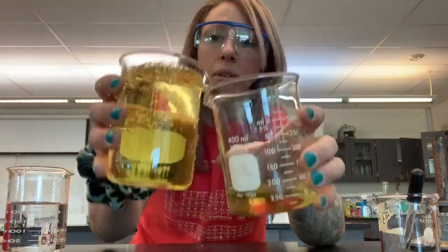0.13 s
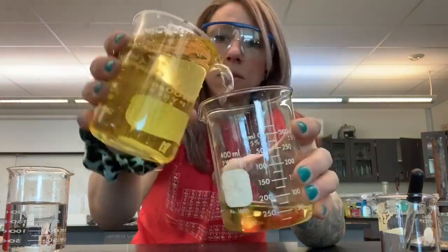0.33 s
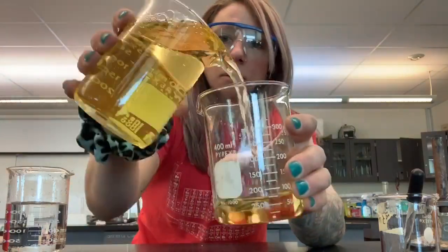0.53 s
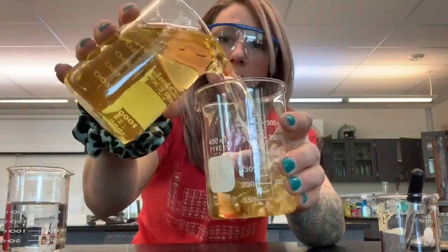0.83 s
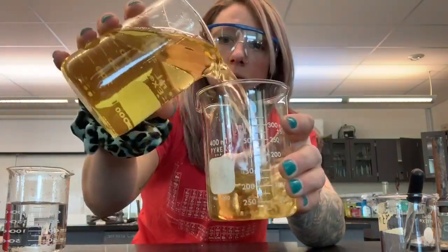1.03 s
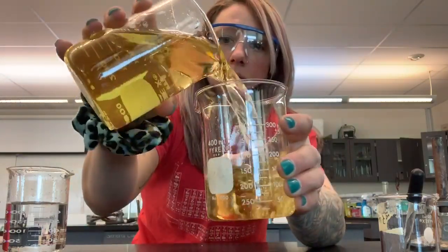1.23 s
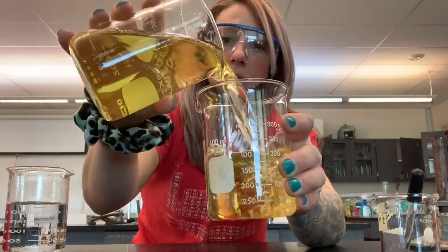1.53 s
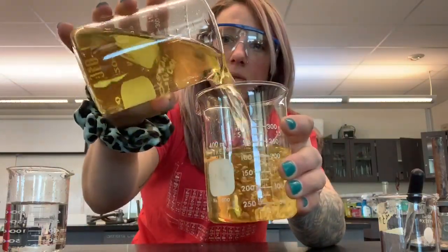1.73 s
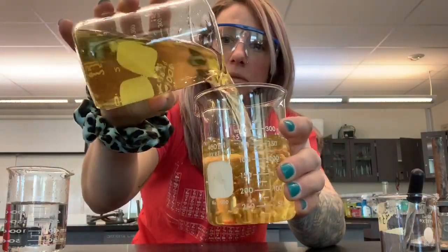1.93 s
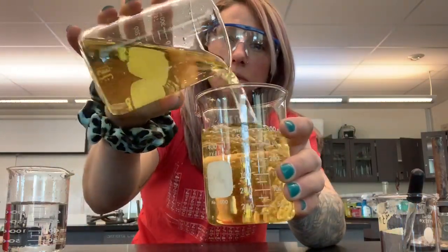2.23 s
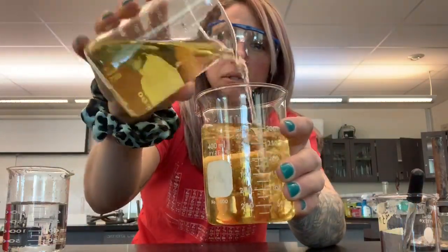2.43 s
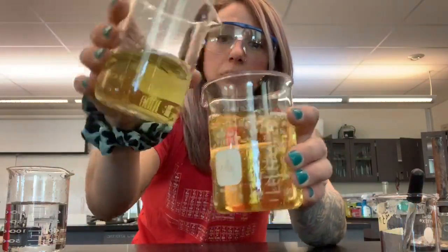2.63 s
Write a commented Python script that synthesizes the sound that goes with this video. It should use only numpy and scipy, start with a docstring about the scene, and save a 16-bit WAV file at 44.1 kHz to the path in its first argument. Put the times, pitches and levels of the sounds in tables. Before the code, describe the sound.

Liquid pours from one glass beaker into another, close to the microphone. After a few knocks, it lands with a splash, gurgles, rises in pitch and thins to a soft trickle. Classroom ventilation hums underneath.

```python
"""Liquid pours from one glass beaker into another, close up, in a ventilated classroom.
After a few knocks, the stream lands with a splash that rings the glass, gurgles as it traps large
bubbles, then thins to a soft trickle and last drops. Each bubble is a short, dying sine.
Impacts sound the air column in the receiving beaker, which rises in pitch as it fills.
A dull bed of ventilation noise and hum lies under it all."""
import sys
import numpy as np
from scipy import signal
from scipy.fft import rfft, irfft, next_fast_len
from scipy.io import wavfile

SR = 44100
rng = np.random.default_rng(int(sys.argv[2]) if len(sys.argv) > 2 else 0)


def to_wav(s):
    """Save 16-bit WAV."""
    ch = np.atleast_2d(s).T  # columns
    pcm = np.round(np.clip(ch, -1, 1) * 32767)  # PCM
    wavfile.write(sys.argv[1], SR, pcm.astype(np.int16))


N = 123479
T = np.arange(N) / SR
ROOM_T60_S = 0.37

# colour of the ventilation bed: f/Hz, level/dB
VENT_COLOUR = [(22, -39), (45, -17), (80, -10.5), (125, -8.5), (155, -6.5), (210, 1), (280, 1.5),
               (380, -6.5), (500, -5.5), (700, -10), (950, -22), (1500, -21.5), (1900, -40), (5000, -43),
               (9000, -52), (15000, -56.5)]
# its hum tones: f/Hz, level/dB
VENT_HUM = [(126, -61.5), (206, -56.5), (281, -60.5), (475, -62)]
# its panning: f/Hz, left minus right/dB
VENT_PAN = [(100, 1.5), (200, 0.5), (350, -3), (600, 2.5), (1100, 3), (2500, -2)]
# its stereo width: f/Hz, left-right correlation
VENT_WIDTH = [(60, 0.95), (150, 0.9), (350, 0.54), (900, 0.96), (2000, 0.55), (6000, 0.6), (8000, 0.7),
              (15000, .95)]
# its phase between the microphones: f/Hz, left lead/rad
VENT_LEAD = [(60, 0.085), (150, 0.47), (280, 1.21), (480, 2.01), (1000, 2.42), (5000, 3.3), (9000, 1.6),
             (13500, 5.6)]
# knocks, the first already dying away: t/s, level/dB, room send/dB
KNOCK_CUES = [(-.045, -37, 7), (.068, -56.5, 15), (0.1101, -31, -0.5), (0.1131, -33, -3.5)]
# colour of a knock: f/Hz, level/dB
KNOCK_COLOUR = [(200, -7), (800, 0.5), (1450, 11.5), (2000, 1), (3200, 6), (5000, 5.5), (7500, -1.5),
                (9400, -0.5), (11000, -4), (12500, -8), (15500, -12)]
# faders of the stream: t/s, gurgle level/dB, trickle level/dB, spray level/dB
STREAM_FADERS = [(0.48, -81, -80, -79), (0.54, -68.5, -59.5, -63), (0.64, -63, -72, -66),
                 (0.72, -62, -56, -60), (0.82, -56, -58, -60.5), (0.91, -54, -70, -64.5),
                 (1.06, -55.5, -58, -63), (1.15, -55, -67, -71), (1.25, -58.5, -66, -77),
                 (1.34, -50, -61, -75), (1.46, -56.5, -64, -86), (1.64, -62.5, -66.5, -87),
                 (1.91, -65.5, -66, -85), (2.04, -64, -66.5, -87), (2.23, -67, -68.5, -87),
                 (2.53, -66, -74.5, -85), (2.68, -70, -78, -84), (2.8, -73.5, -92, -100)]
# pitch of the air column above the liquid: t/s, f/Hz
COLUMN_PITCH = [(.5, 846), (1.25, 855), (1.45, 930), (1.65, 1105), (2.3, 1280), (2.7, 1370)]
# colour of the small bubbles: f/Hz, level/dB
TRICKLE_COLOUR = [(1300, 11), (1700, -14), (2080, 2), (2350, -7.5), (2620, 4.5), (2900, 1), (3330, 3),
                  (4000, -14.5), (5000, -13)]
# cross resonances of the air in the beaker: f/Hz, level/dB, bandwidth/Hz
CAVITY_MODES = [(2095, 2, 165), (2590, -0.5, 320), (3350, 4, 290), (4490, -8.5, 730), (5760, -12.5, 290),
                (6480, -10.5, 380)]
# colour of spray and fizz: f/Hz, level/dB
SPRAY_COLOUR = [(1500, -16), (3500, 12), (4500, -4.5), (5800, 7.5), (7200, -0.5), (8600, 0), (10300, 0.5),
                (12000, -9.5), (15500, -6.5)]
# thin ring as the liquid first spreads: t/s, f/Hz, level/dB
RING_SWEEP = [(.455, 4950, -70), (.52, 5330, -58), (.558, 5740, -46), (.59, 6030, -54), (.70, 6450, -57),
              (.76, 6900, -70)]
# featured bubbles and drops: t/s, f/Hz, level/dB, t60/s, rise/(share of pitch per s)
PLOP_CUES = [(.478, 3460, -55, .049, 0), (.494, 2600, -44, .015, 0), (.5355, 2108, -32.5, .017, 0),
             (.537, 2640, -37.5, .025, 0), (.539, 3300, -31, .031, 0), (.608, 3500, -48, .02, 2),
             (.619, 3620, -49, .02, 2), (.652, 2230, -47.5, .026, 0), (.665, 1200, -44, .04, 4),
             (.669, 1880, -38, .022, 12), (.686, 2640, -36.5, .022, 0), (.690, 1130, -43, .03, 6),
             (.723, 1326, -41, .022, 3), (.735, 4370, -39.5, .023, 0), (.738, 2000, -39.5, .026, 12),
             (.778, 1870, -37, .035, 16), (.7825, 3470, -37, .018, 0), (.7848, 820, -31, .027, 7),
             (.805, 2060, -35.5, .018, 4), (.815, 1430, -41, .025, 5), (.824, 1200, -38.5, .013, 0),
             (.825, 830, -36, .035, 2), (.8305, 2020, -43, .018, 4), (.834, 854, -41, .06, 2),
             (.882, 1300, -38, .017, 0), (.891, 870, -38.5, .022, 5), (.989, 960, -39, .03, 8),
             (1.010, 3340, -47, .025, 0), (1.015, 1096, -36, .03, 0), (1.030, 880, -34, .04, 0),
             (1.035, 2010, -43, .014, 4), (1.039, 4950, -48, .022, 0), (1.0475, 850, -24.5, .023, 5),
             (1.053, 2000, -39, .013, 5), (1.084, 1960, -45, .025, 2), (1.098, 885, -40.5, .03, 2),
             (1.172, 860, -35.5, .02, 3), (1.203, 852, -40, .026, 2), (1.248, 720, -39.5, .03, 3),
             (1.2545, 2110, -50, .018, 4), (1.267, 705, -33.5, .06, 6), (1.296, 2480, -43, .02, 2),
             (1.311, 1370, -37.5, .027, 8), (1.326, 2600, -43, .035, 2), (1.324, 892, -38.5, .025, 4),
             (1.345, 890, -37, .035, 3), (1.360, 1180, -41, .025, 8), (1.371, 827, -35.5, .03, 4),
             (1.372, 1880, -39.5, .013, 4), (1.411, 1170, -37, .025, 9), (1.413, 2050, -45, .016, 3),
             (1.452, 920, -39.5, .023, 6), (1.466, 2110, -50, .018, 3), (1.503, 1150, -46, .022, 4),
             (1.524, 5750, -51.5, .029, 0), (1.609, 2580, -51, .02, 0), (1.626, 6110, -52, .021, 0),
             (1.64, 1115, -49, .18, 0), (1.7015, 2610, -50, .02, 0), (1.801, 1190, -45, .018, 3),
             (1.818, 1300, -41, .01, 0), (1.8205, 2560, -46, .012, 0), (1.86, 5930, -48, .025, 0),
             (1.867, 2790, -51, .03, 0), (1.960, 1280, -45.5, .025, 4), (1.976, 3420, -52, .02, 0),
             (2.071, 2200, -52, .018, 3), (2.218, 3230, -50, .022, 0), (2.343, 1150, -38, .016, 6),
             (2.392, 3230, -51, .035, 0), (2.456, 2540, -50, .03, 0), (2.475, 2530, -48, .023, 0),
             (2.547, 2530, -53, .022, 0), (2.5803, 1390, -37.5, .028, 2), (2.581, 2110, -38, .0053, 0),
             (2.605, 2000, -50, .015, 0)]
# drops slapping liquid and glass: t/s, snap level/dB, ring level/dB, snap t60/s, tick level/dB
SPLASH_CUES = [(.5362, -42, -33.5, .008, -22), (.554, -40, -56, .012, -42), (.762, -54, -42.5, .015, -48),
               (.8803, -35, -41, .036, -45), (.9356, -43, -69, .02, -37), (1.105, -41, -69, .015, -36),
               (1.373, -39, -54, .011, -55)]
# colour of a splash's snap: f/Hz, level/dB
SNAP_COLOUR = [(500, -16), (1200, 1), (2500, 9), (4500, 8.5), (6500, 6.5), (9000, 7.5), (12000, 1),
               (16000, -7.5)]
# its stereo width: f/Hz, left-right correlation
SNAP_WIDTH = [(1000, .8), (3500, .2), (6000, .4), (9000, .9)]
# colour of the bright tick at contact: f/Hz, level/dB
TICK_COLOUR = [(4000, -16), (7000, 0), (11000, 0.5), (16000, 3)]
# ring of the beaker: f/Hz, level/dB, t60/s
BEAKER_MODES = [(2250, -14, 0.072), (2585, -9.5, 0.047), (3299, 1.5, 0.042), (5163, -24.5, 0.048),
                (5755, -12, 0.1), (6450, -25, .1)]
# fine droplets on the glass: t/s, f/Hz, level/dB, attack/s
DROPLET_CUES = [(.6636, 10440, -38, .0006), (.6803, 10700, -36, .0006), (.7833, 10190, -40, .0005),
                (.8274, 10080, -43, .0005), (.9691, 10080, -42, .0005), (1.0012, 9820, -36, .0005),
                (1.058, 15200, -41, .0004), (1.0783, 9730, -39, .0006), (1.153, 9600, -39, .0005),
                (1.2245, 9950, -44, .0005), (1.6517, 9240, -43, .00015), (1.7009, 9930, -51, .0004),
                (1.8222, 9520, -48, .0006), (2.0175, 8590, -36, .00015), (2.05, 8570, -37, .00015),
                (2.0552, 8480, -34, .00017), (2.579, 7800, -45, .0002)]
# stereo width of the room sound: f/Hz, left-right correlation
ROOM_WIDTH = [(200, .6), (1000, -0.33), (4000, -.2), (5500, 0.2), (8000, 0.4), (10000, .85), (14000, .85)]
# panning of the pour: f/Hz, left minus right/dB
POUR_PAN = [(500, -1.5), (1000, -4.5), (2000, -1), (3500, -2), (5000, 4), (6500, 0), (15000, 1)]
# phase of pour and knocks between the microphones: f/Hz, left lead/rad
ACTION_LEAD = [(200, -.1), (1000, -.75), (2000, -1.6), (4000, -3.0), (6000, -4.3), (7200, -4.0),
               (9100, -3.14), (11000, -1.7), (12200, -.8), (13200, 0), (16000, .2)]


def from_db(db):
    """Decibels to gain."""
    return 10 ** (np.asarray(db) / 20)


def unit_rms(x):
    """Normalise to an rms of 1."""
    return x / np.sqrt(np.mean(x ** 2) + 1e-20)


def at_hz(points, hz):
    """Read a table on a log-frequency axis."""
    f, value = np.transpose(points)
    return np.interp(np.log(hz + 1), np.log(f), value)


def shaped(x, response):
    """Filter by a response given as a function of frequency."""
    size = next_fast_len(2 * N)
    hz = np.arange(size // 2 + 1) * SR / size
    return irfft(rfft(x, size) * response(hz), size)[..., :N]


def eq(x, colour):
    """Equalise by a table of f/Hz, level/dB."""
    return shaped(x, lambda hz: from_db(at_hz(colour, hz)))


def resonance(hz, width_hz):
    """Coefficients of a resonant band-pass with a peak gain of 1."""
    r = np.exp(-np.pi * width_hz / SR)
    return (1 - r * r) / 2 * np.array([1, 0, -1]), [1, -2 * r * np.cos(2 * np.pi * hz / SR), r * r]


def mid_side(pair, width):
    """Mix two unrelated signals as mid and side to set their correlation."""
    def response(hz):
        correlation = at_hz(width, hz)
        return np.sqrt(np.array([1 + correlation, 1 - correlation]) / 2)
    mid, side = shaped(pair, response)
    return np.array([mid + side, mid - side])


def phased(pair, lead):
    """Set the phase difference between left and right."""
    return shaped(pair, lambda hz: np.exp(.5j * at_hz(lead, hz) * np.array([[1], [-1]])))


def panned(pair, pan):
    """Set the level difference between left and right."""
    return shaped(pair, lambda hz: from_db(at_hz(pan, hz) / 2 * np.array([[1], [-1]])))


def add(out, s, sound):
    """Mix a sound in at s seconds, trimmed to the track."""
    i = int(s * SR)
    sound, i = sound[max(-i, 0):], max(i, 0)
    out[i:i + len(sound)] += sound[:max(len(out) - i, 0)]


def dying_noise(t60):
    """White noise that falls 60 dB in t60 seconds."""
    return rng.standard_normal(SR) * from_db(-60 * T[:SR] / t60)


def narrow_noise(shape, centre_hz, half_width_hz):
    """A narrow band of noise that wavers around its centre."""
    noise = rng.standard_normal(shape)
    return unit_rms(shaped(noise, lambda hz: 1 / (1 + ((hz - centre_hz) / half_width_hz) ** 2)))


def grains(per_s, spread_db):
    """Irregular grain cues: rows of t/s, signed gain, pitch draw from 0 to 1."""
    count = int(per_s * N / SR)
    jitter, strength, polarity, draw = np.random.default_rng(rng.integers(2 ** 31)).random((count, 4)).T
    times = (np.arange(count) + 2 * jitter) / per_s
    level_db = spread_db * np.minimum(-np.log(1 - strength), 3)
    return np.transpose([times, from_db(level_db) * np.sign(polarity - .5), draw])


def clicks(per_s, spread_db):
    """A train of random impacts."""
    times, gains, _ = grains(per_s, spread_db).T
    return np.bincount((times * SR).astype(int), gains, N)[:N]


def ventilation():
    """A bed of dull air noise with a few wavering hum tones."""
    air = from_db(-49.5) * unit_rms(eq(rng.standard_normal((2, N)), VENT_COLOUR))
    for hz, db in VENT_HUM:
        air += from_db(db) * narrow_noise((2, N), hz, half_width_hz=7)
    return phased(panned(mid_side(air, VENT_WIDTH), VENT_PAN), VENT_LEAD)


def knocks(t60=0.028):
    """Hard clacks further off, wet with room sound."""
    pair = np.zeros((2, N))
    for s, db, send_db in KNOCK_CUES:
        tail_gain = from_db(db + send_db) * np.sqrt(t60 / ROOM_T60_S)
        for side in pair:
            add(side, s, from_db(db) * dying_noise(t60))
            add(side, s, tail_gain * dying_noise(0.79 * ROOM_T60_S))
    return eq(mid_side(pair, ROOM_WIDTH), KNOCK_COLOUR) * from_db([[1], [-1]])  # a little to the left


def bubble(hz, t60, glide, swell_cycles=1.7):
    """A trapped bubble rings: an unsteady sine that swells, glides up and dies."""
    t = T[:SR // 10]
    envelope = (1 - np.exp(-(t * hz / swell_cycles) ** 2)) * from_db(-60 * t / t60)
    drift = np.interp(t, np.arange(50) / 500, rng.standard_normal(50))
    wobble_rad = 0.15 * drift * min(hz, 3000) / 1000
    phase = 2 * np.pi * hz * (t + glide * t * t / 2)
    return envelope / envelope.max() * np.sin(phase + wobble_rad)


def column_hz(s):
    """The air column's pitch climbs as the liquid shortens it."""
    return np.interp(s, *np.transpose(COLUMN_PITCH))


def gurgle():
    """Large bubbles, thickest and loudest near the pitch of the air column."""
    out = np.zeros(N)
    for s, gain, draw in grains(per_s=170, spread_db=4):
        octaves = 0.1945 * np.log((draw + 0.023) / (1.02 - draw)) + 0.056  # bell-shaped detune
        tone = bubble(column_hz(s) * 2 ** octaves, t60=0.042, glide=5 * rng.random())
        add(out, s, gain * from_db(-7 * abs(octaves)) * tone)
    return unit_rms(out)


def churn(block=128):
    """Dense impacts sound the rising air column."""
    out, state = np.zeros(N), np.zeros(2)
    impacts = clicks(per_s=700, spread_db=4)
    for i in range(0, N, block):
        column = resonance(column_hz(i / SR), width_hz=120)
        out[i:i + block], state = signal.lfilter(*column, impacts[i:i + block], zi=state)
    return unit_rms(out)


def trickle():
    """Small bubbles, coloured by the resonances of the beaker."""
    out = np.zeros(N)
    for s, gain, draw in grains(per_s=460, spread_db=5.5):
        hz = 1350 * 2 ** (1.8 * draw)
        add(out, s, gain * bubble(hz, t60=24 / hz, glide=10 * rng.random()))
    return unit_rms(eq(out, TRICKLE_COLOUR))


def cavity(drive):
    """The air in the beaker rings in its cross resonances, alternating in polarity."""
    return sum((-1) ** k * from_db(db) * signal.lfilter(*resonance(hz, width), drive + 1e-18)
               for k, (hz, db, width) in enumerate(CAVITY_MODES))


def patter():
    """Dense impacts sound the cross resonances."""
    return unit_rms(cavity(clicks(per_s=420, spread_db=7)))


def spray():
    """Droplets burst in short, broad crackles, each with its own pitch."""
    out, t = np.zeros(N), T[:SR // 50]
    for s, gain, draw in grains(per_s=330, spread_db=5.5):
        burst = rng.standard_normal(len(t)) * t * np.exp(-t / 0.00081)
        band = resonance(5000 + 10000 * draw, width_hz=920)
        add(out, s, gain * signal.lfilter(*band, burst))
    return unit_rms(eq(out, SPRAY_COLOUR))


def fizz():
    """Countless tiny bursts blur into a hiss."""
    return unit_rms(eq(clicks(per_s=2500, spread_db=7), SPRAY_COLOUR))


def stream(start_s=0.438, fade_in_s=0.03):
    """The running stream: body, mids and top, each riding its own fader."""
    times, *levels = np.transpose(STREAM_FADERS)
    body_gain, mid_gain, top_gain = [from_db(np.interp(T, times, db)) for db in levels]
    body = from_db(-0.5) * gurgle() + from_db(-4.5) * churn()
    mids = from_db(1) * trickle() + from_db(2) * patter()
    top = from_db(3) * spray() + from_db(-3.5) * fizz()
    fade_in = np.clip((T - start_s) / fade_in_s, 0, 1)
    return fade_in * (body_gain * body + mid_gain * mids + top_gain * top)


def spreading_ring():
    """A thin, fluttering resonance climbs as the liquid first spreads."""
    times, hz, db = np.transpose(RING_SWEEP)
    envelope = from_db(np.interp(T, times, db)) * (T > times[0]) * (T < times[-1])
    flutter = narrow_noise(N, centre_hz=0, half_width_hz=45)
    phase = 2 * np.pi * np.cumsum(np.interp(T, times, hz)) / SR
    return envelope * flutter * np.sin(phase)


def plops():
    """Single bubbles stand out of the stream, each with a splatter that rings the beaker's air."""
    tones, splatter = np.zeros((2, N))
    for s, hz, db, t60, glide in PLOP_CUES:
        add(tones, s, from_db(db - 0.5) * bubble(hz, t60, glide))
        add(splatter, s, from_db(db - 11) * dying_noise(t60=0.022))
    return tones + cavity(splatter)


def splashes(attack_s=0.00077):
    """Each splash ticks, snaps all round the wall and sets the beaker ringing."""
    ticks, rings = np.zeros((2, N))
    snaps, t = np.zeros((2, N)), T[:SR]
    ring = sum(from_db(db - 60 * t / t60) * np.sin(2 * np.pi * hz * t) for hz, db, t60 in BEAKER_MODES)
    attack = 1 - np.exp(-t / attack_s)
    for s, snap_db, ring_db, snap_t60, tick_db in SPLASH_CUES:
        for side in snaps:
            add(side, s, from_db(snap_db) * attack * dying_noise(snap_t60))
        add(ticks, s, from_db(tick_db) * attack * dying_noise(t60=0.0091))
        add(rings, s, from_db(ring_db) * ring)
    return eq(mid_side(snaps, SNAP_WIDTH), SNAP_COLOUR) + eq(ticks, TICK_COLOUR) + rings


def droplets():
    """Fine droplets hit the glass, each a tiny, bright pip."""
    out, t = np.zeros(N), T[:SR // 50]
    for s, hz, db, attack_s in DROPLET_CUES:
        envelope = (t / attack_s * np.exp(1 - t / attack_s)) ** 2
        add(out, s, from_db(db) * envelope * np.sin(2 * np.pi * hz * t))
    return out


def reverb(send, t60):
    """Diffuse stereo reflections with the energy of the source."""
    build_up = 1 - np.exp(-T[:SR] / 0.0023)
    tails = [build_up * dying_noise(t60) for _ in range(2)]
    wet = [signal.fftconvolve(send, tail / np.linalg.norm(tail))[:N] for tail in tails]
    return mid_side(np.array(wet), ROOM_WIDTH)


def scene():
    """The close pour with early reflections and room tail, the knocks and the ventilation bed."""
    pour = stream() + plops() + droplets() + spreading_ring() + splashes()
    send = pour.mean(axis=0)
    early = from_db(-4) * reverb(send, t60=0.036)
    room = from_db(-11.5) * reverb(send, ROOM_T60_S)
    action = panned(pour + early + room, POUR_PAN) + knocks()
    return phased(action, ACTION_LEAD) + ventilation()


def record(dry):
    """A steep low-pass takes off the very top."""
    cutoff_hz = 16300
    return signal.sosfilt(signal.ellip(10, .1, 70, cutoff_hz, fs=SR, output="sos"), dry)


dry = scene()
out = record(dry)
to_wav(out)
```